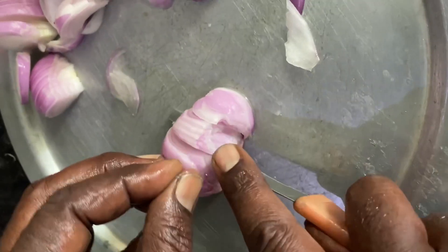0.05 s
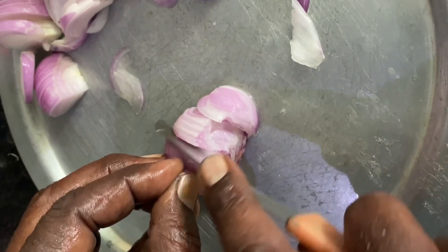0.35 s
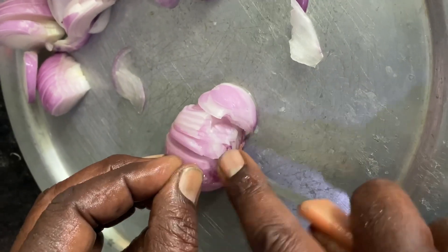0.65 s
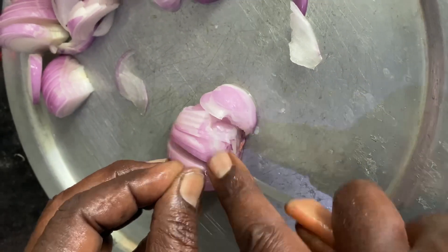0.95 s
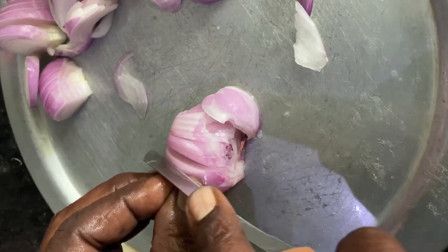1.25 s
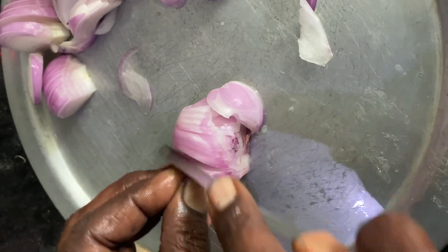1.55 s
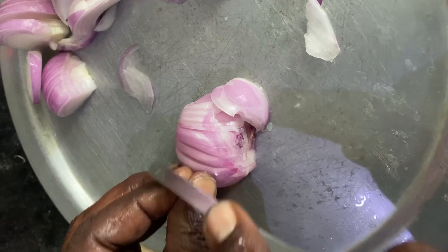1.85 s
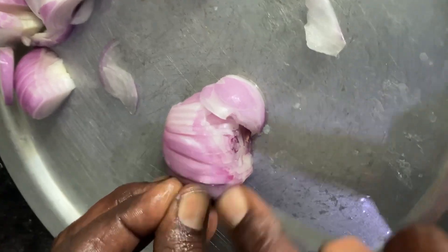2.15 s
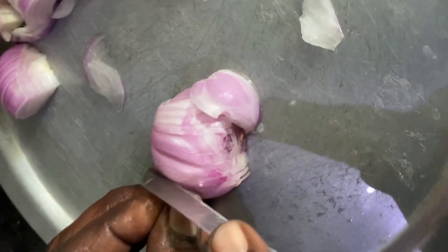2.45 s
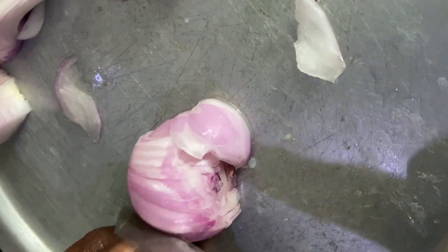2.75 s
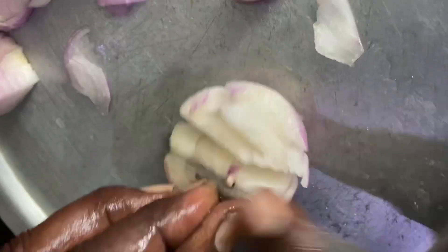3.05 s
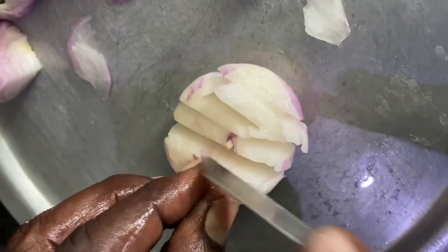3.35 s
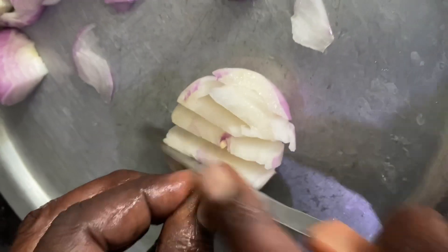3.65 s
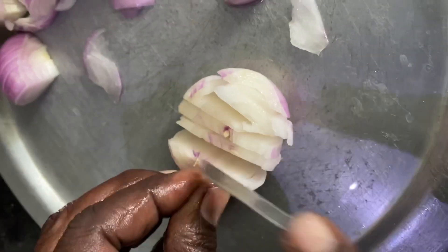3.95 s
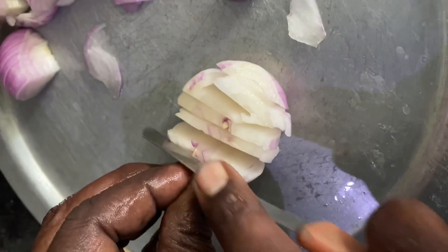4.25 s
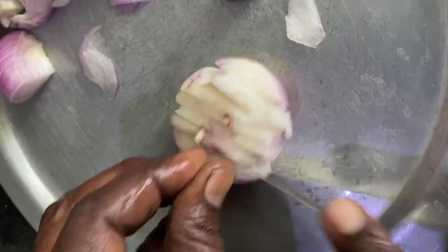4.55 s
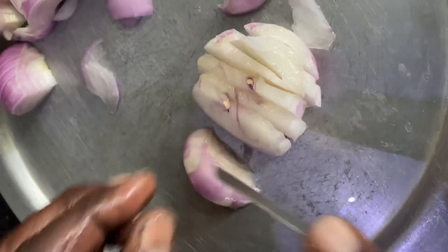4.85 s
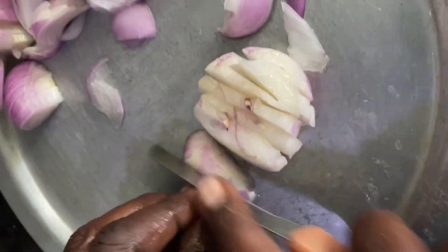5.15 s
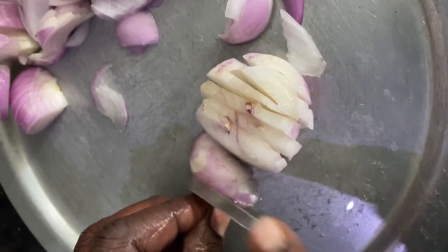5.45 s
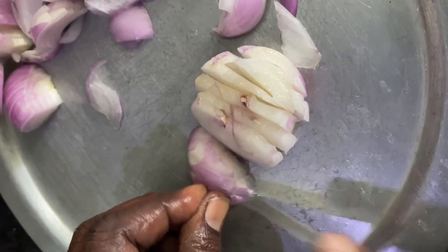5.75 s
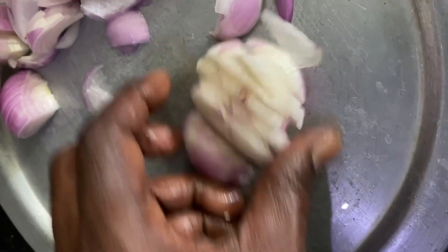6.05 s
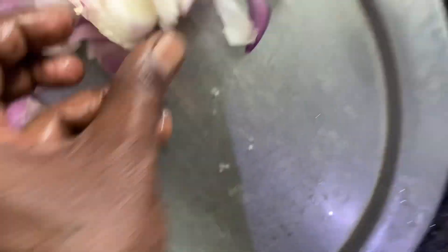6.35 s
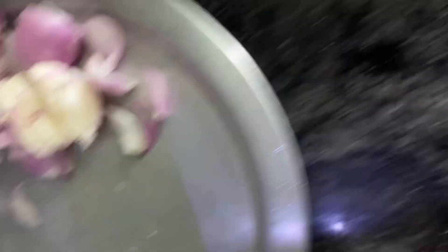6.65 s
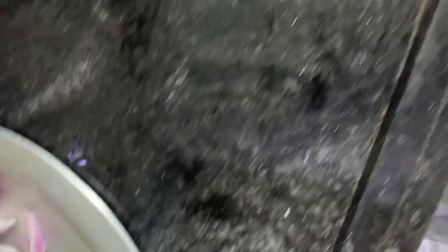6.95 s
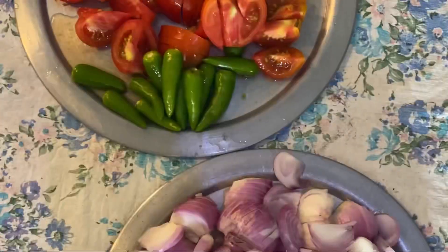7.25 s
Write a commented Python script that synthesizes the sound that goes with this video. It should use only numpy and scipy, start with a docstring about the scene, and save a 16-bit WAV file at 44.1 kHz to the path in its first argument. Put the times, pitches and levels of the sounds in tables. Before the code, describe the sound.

Close up, over a low hum and soft air noise, a knife crunches through onion and clicks against a steel plate at an uneven pace, echoing a little in the kitchen. After about three seconds the cuts turn lighter and the edge scrapes the metal as it is drawn back. Fingers shift the damp pieces, then a plate is knocked and rings briefly before a louder, deep airy noise takes over.

```python
"""A hard-walled kitchen, where a small knife slices an onion on a steel plate, close to a phone.
Each cut crunches through the layers and ends as the blade clacks on the steel. Once the bulb has
fallen open, the edge scrapes the plate as it is drawn back. Fingers shift the wet pieces, a motor hums,
and a limiter turns the echo down after loud clacks. Near the end a plate is bumped; its ring stops
short, and a louder rush of air follows."""
import sys
import numpy as np
from scipy import signal
from scipy.fft import rfft, irfft, next_fast_len
from scipy.io import wavfile
from scipy.ndimage import uniform_filter1d, minimum_filter1d

SR = 44100
rng = np.random.default_rng(int(sys.argv[2]) if len(sys.argv) > 2 else 0)


def persist_wave(psi):
    """Save psi, clipped to +-1, as 16-bit WAV."""
    counts = np.round(np.clip(psi, -1, 1) * 32767).astype(np.int16)
    wavfile.write(sys.argv[1], SR, np.atleast_2d(counts).T)


N = 322459
TIME = np.arange(N) / SR
SIDES = np.array([[1], [-1]])  # plus for the left ear, minus for the right

# Sounds on the plate have three parts: body (low), ring (middle) and hiss (high).
# In the tables, body and hiss turn those parts up or down against the ring.
# Knife cuts: blade meets steel/s, slicing time/s, crunch level/dB, crunch body/dB, juice hiss/dB,
# clack level/dB, chatter time/s, chatter f/Hz, clack body/dB, edge tick/dB, echo/dB
CUTS = [(0.5946, 0.061, -19.5, -1, -3.5, -4.5, 0.0077, 2410, -11, -7.5, 3.5),
        (0.94, .062, -23.5, 2, -0.5, -7, 0.0053, 2390, -9.5, -7.5, 5),
        (1.361, 0.07, -26, 1.5, 2.5, -11, 0.0047, 2470, -9.5, -9, 8.5),
        (2.1711, 0.086, -34, 7, 3, -10, 0.0037, 2675, -8.5, -5, 4.5),
        (2.7871, .04, -20, 1, -2.5, -6, 0.0051, 2770, -11, -6.5, 1.5),
        (3.086, .11, -35, -10.5, 1.5, -23.5, 0.0043, 2500, -8.5, -3, -6),
        (3.6996, .11, -39, -6, 3.5, -15.5, 0.005, 2496, -11.5, -6.5, -3.5),
        (4.4407, .08, -34, -6, 2.5, -18, 0.0031, 2500, -6.5, -2, 0),
        (5.119, 0.021, -44, -10, -11, -15.5, 0.0064, 2300, -5.5, -7, -4.5)]
# The blade is drawn out of the opened bulb: start/s, end/s, level/dB, body/dB, squeak level/dB
DRAWS = [(3.091, 3.224, -47, -6.5, -41.5), (3.698, 3.83, -37.5, -12.5, -30.5),
         (4.449, 4.596, -38, -15, -28.5), (5.127, 5.266, -31.5, -8.5, -51),
         (5.604, 5.787, -31.5, -8.5, -21)]
# Stretches of steady air noise: start/s, level/dB
STRETCHES = [(0, -51), (2.941, -56.5), (7.138, -58), (7.275, -39.5)]
BULB_OPENS_S, HUSH_S = STRETCHES[1][0], STRETCHES[2][0]


def amp(db):
    """Turn decibels into a factor to multiply by."""
    return 10 ** (np.asarray(db) / 20)


def unit(x):
    """Scale to an average power of 1."""
    return x / np.sqrt(np.mean(x ** 2) + 1e-20)


def add(out, s, x):
    """Mix x into out from time s."""
    i = max(int(s * SR), 0)
    part = out[..., i:i + x.shape[-1]]
    part += x[..., :part.shape[-1]]


def along(hz, points, values):
    """Join values by straight lines, giving each octave equal room."""
    return np.interp(np.log(np.maximum(hz, 1)), np.log(points), values)


def band(x, lo_hz, hi_hz, order=3):
    """Keep what lies between two frequencies."""
    sos = signal.butter(order, [lo_hz, min(hi_hz, .48 * SR)], "band", fs=SR, output="sos")
    return signal.sosfilt(sos, x)


def fade(t, t60):
    """Die away by 60 dB in t60 seconds, the fade time."""
    return np.exp(-np.log(1000) * t / t60)


def rise(t, rise_s):
    """Climb from 0 towards 1, most of the way in rise_s."""
    return 1 - np.exp(-t / rise_s)


def wander(t, rate):
    """Glide between random values, rate of them a second."""
    return np.interp(t * rate, np.arange(512), rng.standard_normal(512))


def at(states, s):
    """Pick what holds at time s: the whole bulb first, the opened bulb later."""
    return states[int(s > BULB_OPENS_S)]


def pair(mid, side, side_db=-2):
    """Sound from all around differs between left and right, mostly at middle pitches."""
    return mid + amp(side_db) * band(side, 270, 3700, order=2) * SIDES


def house_air():
    """The air of the house makes a soft, deep noise."""
    # Tone of the air: f/Hz, level/dB
    spectrum = [(20, -20.5), (40, -12.5), (75, -7), (150, -15.5), (230, -13), (400, -14.5), (800, -24),
                (1600, -30), (4400, -41), (7000, -47), (12000, -46.5), (16000, -64.5)]
    size = next_fast_len(N, True)
    gain = amp(along(np.fft.rfftfreq(size, 1 / SR), *np.transpose(spectrum)))
    mid, side = irfft(rfft(rng.standard_normal((2, size))) * gain, size)[:, :N]
    return unit(pair(mid + 0.38 * SIDES * side, side))


def motor_hum(waver_rad=0.55):
    """A motor hums with two slightly wavering tones."""
    # Hum tones: f/Hz, level/dB
    tones = [(150.3, -53), (333.8, -66.5)]
    drift = np.interp(TIME * 5, np.arange(64), rng.standard_normal(64))
    return sum(np.sqrt(2) * amp(db) * np.sin(2 * np.pi * hz * TIME + waver_rad * drift)
               for hz, db in tones)


def hands_and_counter(hand_boost_db=3, thud_db=-31.5, thud_width_s=0.052):
    """Hands rumble on the phone; each cut thuds through the counter, louder with a fuller crunch."""
    # Rumble of the hands: t/s, level before the boost/dB
    handling = [(0.0, -41.5), (0.63, -55.5), (1.07, -48), (1.65, -66), (2.63, -58), (3.55, -63),
                (5.92, -58.5), (6.03, -57.5), (6.9, -54)]
    mid, side = band(rng.standard_normal((2, N)), 65, 150, order=2)
    rumble = unit(mid + 0.18 * side * SIDES)
    thuds = sum(amp(thud_db + 0.43 * (db + body_db)) / (1 + ((TIME - s) / thud_width_s) ** 2) ** 2
                for s, _, db, body_db, *_ in CUTS)
    hands = amp(np.interp(TIME, *np.transpose(handling)) + hand_boost_db)
    return rumble * (thuds + hands)


def kitchen_echo(early_db=5, early_t60=0.28, room_db=0.5):
    """The room's answer to a click: quick returns from the counter, then a long tail that dulls."""
    # Echo tail: f/Hz, fade time/s, level/dB
    room = [(200, 0.39, -13.5), (500, 0.73, -12.5), (1134, 0.87, -4), (2580, 0.75, -6.5), (4970, 0.67, -2),
            (7200, .6, -11.5), (10700, 0.52, -6.5), (15000, .42, -8)]
    points, t60s, dbs = np.transpose(room)
    out, t, edges = 0, np.arange(SR) / SR, np.geomspace(100, 18000, 16)
    for lo, hi in zip(edges, edges[1:]):
        hz = np.sqrt(lo * hi)
        tail = fade(t, along(hz, points, t60s))
        shape = (tail + amp(early_db) * fade(t, early_t60)) * rise(t, 0.00044)
        noise = band(rng.standard_normal((2, SR)), lo, hi)
        out += amp(along(hz, points, dbs)) * noise * shape / np.sqrt(np.sum(shape ** 2))
    return amp(room_db) * pair(*out)


def plate_sliding(waver_db=3):
    """The rim of a sliding plate rubs the counter with a faint, unsteady ring."""
    # Ring of the rim: start/s, end/s, f/Hz, width/Hz, level/dB
    slide = (5.5, 7.5, 4449.5, 348.5, -81.5)
    start, end, hz, width, db = slide
    swell = np.sin(np.pi * np.clip((TIME - start) / (end - start), 0, 1))
    level = swell * amp(db + waver_db * wander(TIME, 25))
    return level * unit(band(rng.standard_normal(N), hz - width / 2, hz + width / 2, order=1))


def plate_bumping(crack_db=-9, rattle_db=-22, clink_db=-3):
    """A knock with a short crack leaves a plate rocking: it booms unevenly and faintly rattles."""
    # Knocks: t/s, level/dB
    bumps = [(6.952, -18.5), (7.048, -26.5)]
    # Tones of a freely ringing plate: f/Hz, fade time/s, level/dB, build-up/s
    tones = [(97.2, 3.3, -9.5, 0.134), (189, 0.21, -10.5, .004), (242, 0.24, -1, 0.0043),
             (275, 0.44, -14.5, 0.017), (558, 1.2, -23.5, 0.01856), (1060, 0.47, -19.5, 0.0019),
             (1564, 0.3, -21.5, 0.0011), (2190, 0.38, -26, 0.0027), (2580, 0.3, -28.5, 0.0019),
             (4570, 0.1, -17, .002), (5580, 0.16, -23, .002), (7950, 0.17, -41.5, .002)]
    out, t = np.zeros(N), np.arange(SR // 2) / SR
    for k, (s, db) in enumerate(bumps):
        ring = 0
        for hz, t60, tone_db, rise_s in tones:
            level = amp(tone_db + 2 * wander(t, 84)) * fade(t, t60) * rise(t, rise_s)
            ring += level * np.sin(2 * np.pi * hz * t + wander(t, 6 * np.sqrt(hz)))
        knock, clink = rng.standard_normal((2, len(t)))
        noise = unit(band(knock, 380, 1880, order=2))
        noise += amp(clink_db) * unit(band(clink, 4160, 8900, order=2))
        crack = amp(crack_db - 8.3 * k) * fade(t, 0.042)
        rattle = amp(rattle_db) * fade(t, 0.49)
        add(out, s, amp(db) * (ring + (crack + rattle) * noise * rise(t, 0.0005)))
    return out


def damped_plate(opened, direct_db=-11):
    """Muffled by onion and hand, the plate answers a tap briefly. Returns its body, ring and hiss."""
    # Plate tones: f/Hz, fade time/s, level with the bulb whole/dB, level with it open/dB
    tones = [(230, 0.034, -10.5, -10.5), (409.5, 0.11, -2, -24), (540, 0.012, 0.5, -18),
             (907, 0.025, 1, -20), (998, 0.014, 6.5, 9), (1250, 0.018, -7.5, 1), (1584, 0.0087, 6, 9.5),
             (2180, 0.004, 9.5, 8.5), (2280, 0.01, 2.5, -3), (2570, 0.013, 1, 0.5), (3530, 0.04, -4.5, 1.5),
             (3940, 0.004, -4, -6.5), (4500, 0.012, -5, -6), (6730, 0.0089, -8.5, -11),
             (10300, 0.001, -10, -14.5)]
    tap, t = 0, np.arange(1500) / SR
    for hz, t60, *dbs in tones:
        gain = amp(dbs[opened]) * 2 * np.log(1000) / (t60 * SR)  # longer tones start weaker
        tap += gain * fade(t, t60) * np.cos(2 * np.pi * hz * t)
    tap[0] += amp(direct_db)
    # lighter strokes on the opened bulb press less bass into the plate
    body = band(tap, 300 if opened else 130, 1400, order=2)
    ring = band(tap, 1550, 3700, order=2)
    hiss = band(band(tap, 5800, 20000), 100, 19000, order=1)
    return body, ring, hiss


def spread(force, width_db=-9):
    """The broad plate sends body and ring unevenly to the two sides; the hiss comes from one point."""
    wide = force[0] + amp(width_db) * SIDES * force[1]
    return wide, wide, force[[0, 0]]


def contact(plate, forces, span_s, body_db, hiss_db, body_left_db=7):
    """Forces shake the plate's three parts; each gets the energy of span_s seconds at its level."""
    parts = [signal.fftconvolve(force, [answer], axes=1) for force, answer in zip(forces, plate)]
    gains = amp(body_db + 5 + SIDES * body_left_db / 2), 1, amp(hiss_db + 4.5)
    return sum(gain * part * np.sqrt(2 * span_s * SR / np.sum(part ** 2))
               for gain, part in zip(gains, parts))


def stroke(length_s, db, shape_db, grain_db, jerk_db, jerk_hz=350):
    """Jerky rubbing shaped by shape_db(progress 0-1). Returns forces and their span for contact()."""
    t = np.arange(max(int(length_s * SR), 64)) / SR
    swell = amp(db + shape_db(t / t[-1])) * rise(t, 0.19 * t[-1])
    jerks = amp(jerk_db * wander(t, jerk_hz))
    size = (2, SR // 4)
    # countless tiny breaks, a few much larger than the rest
    grains = rng.standard_normal(size) * amp(grain_db * np.minimum(rng.exponential(size=size), 5))
    return spread(swell * jerks * grains[:, :len(t)]), np.sum(swell ** 2) / SR


def wet_ticking(steel, ticks_per_spell=6):
    """Wet pieces of onion tick faintly under the fingers."""
    # Spells of finger work: start/s, end/s, typical level/dB
    spells = [(0.251, 0.502, -55.5), (1.71, 1.837, -59), (2.443, 2.679, -53.5), (3.4, 3.652, -63),
              (4.594, 4.998, -82), (6.178, 6.321, -48.5)]
    out, t = np.zeros((2, N)), np.arange(500) / SR
    for start, end, db in spells:
        for when, softness, brightness in rng.random((ticks_per_spell, 3)):
            force = rng.standard_normal((2, len(t))) * fade(t, .012) * rise(t, .001)
            tick = contact(steel[0], spread(force), 0.0015, body_db=-5, hiss_db=12 * brightness - 9)
            add(out, start + when * (end - start), amp(db - 3 * np.log(0.061 + softness)) * tick)
    return out


def pieces_rustling(steel, wane_db=8.5):
    """Fingers slide pieces of onion over each other and over the plate."""
    # Rustles: start/s, end/s, level/dB, hiss/dB
    rustles = [(2.942, 2.99, -59.5, -5), (3.43, 3.63, -55.5, -10.5), (4.2, 4.342, -52.5, -7),
               (5.548, 5.595, -43.5, -15), (6.0, 6.19, -53, -5), (6.193, 6.249, -43.5, 2.5)]
    out = np.zeros((2, N))
    for start, end, db, hiss_db in rustles:
        forces, span = stroke(end - start, db, lambda u: -wane_db * u, grain_db=3.5, jerk_db=2)
        add(out, start, contact(at(steel, start), forces, span, body_db=-5, hiss_db=hiss_db))
    return out


def blade_drawing(steel, wane_db=12):
    """The flat of the blade rubs wet onion, fading as it comes free."""
    out = np.zeros((2, N))
    for start, end, db, body_db, _ in DRAWS:
        forces, span = stroke(end - start, db, lambda u: -wane_db * u, grain_db=1.5, jerk_db=0)
        add(out, start, contact(at(steel, start), forces, span, body_db, hiss_db=-7.5))
    return out


def edge_scraping(steel, squeak_hz=2350, squeak_s=0.048, swell_db=17):
    """As each draw ends, the edge sticks and slips on the steel and makes the plate squeak."""
    out = np.zeros((2, N))
    for _, end, _, _, db in DRAWS:
        forces, span = stroke(squeak_s, db, lambda u: -swell_db * (1 - u), grain_db=6.5, jerk_db=3)
        body, ring, hiss = forces
        squeak = band(ring, 0.76 * squeak_hz, 1.4 * squeak_hz, order=1)
        scrape = contact(at(steel, end), (body, squeak, hiss), span, body_db=-45, hiss_db=-19)
        add(out, end - squeak_s, scrape)
    return out


def layers_snapping(steel, snap_t60=0.031):
    """Single layers of onion give way and the knife taps lightly."""
    # Snaps and taps: t/s, level/dB, body/dB, hiss/dB
    snaps = [(0.262, -34, -11.5, -10), (0.428, -43.5, 3, -4), (0.534, -32, -4, -6.5),
             (0.554, -25, -5.5, -8), (.566, -22.5, -1.5, -11.5), (0.578, -18, -5, -15),
             (1.808, -54.5, 6.5, -4.5), (2.114, -33.5, 0.5, -4.5), (2.140, -28, 2, -1), (2.763, -35, 5, -3),
             (2.991, -48, -3, -3), (3.184, -45, -5, -0.5), (3.631, -43, -4, -1.5), (3.682, -42, -23, 5),
             (4.588, -34.5, -13.5, -10.5), (4.665, -42.5, 1, -12), (5.0222, -45.5, 7, -26),
             (5.2065, -25.5, -14.5, -14), (5.581, -35.5, -7.5, -25), (5.633, -32, -5.5, -34),
             (6.065, -50.5, -28, -3), (6.277, -54, 5.5, -0.5), (6.386, -69, 12.5, 9.5)]
    out, t = np.zeros((2, N)), np.arange(900) / SR
    for s, db, body_db, hiss_db in snaps:
        force = rng.standard_normal((2, len(t))) * fade(t, snap_t60) * rise(t, 0.0013)
        add(out, s, amp(db) * contact(at(steel, s), spread(force), 0.0089, body_db, hiss_db))
    return out


def onion_slicing(steel, layer_s=0.0087, sag_db=2.5, swell_db=24):
    """Cell walls burst along the blade, layer by layer and ever louder until it meets the steel."""
    out = np.zeros((2, N))
    for s, length, db, body_db, hiss_db, *_ in CUTS:
        def shape_db(u):
            """The crunch sags between layers, and its swell levels off near the steel."""
            layers = (u - 1) * length / layer_s + 0.12 * wander(u * length, 1 / layer_s)
            return sag_db * (.5 - layers % 1) - swell_db * (1 - u) ** 1.3
        forces, span = stroke(length, db, shape_db, grain_db=2, jerk_db=6)
        add(out, s - length, contact(at(steel, s), forces, span, body_db, hiss_db))
    return out


def blade_clacking(steel, tick_t60=0.02, bounce_db=-2):
    """The blade hits the steel, chatters and rings. Returns that sound and single blows for the echo."""
    # Blade tones: f/Hz, fade time/s, level with the bulb whole/dB, level with it open/dB
    tones = [(3558, 0.021, 2.5, 1), (4000, 0.02, -7.5, 5.5), (4526, 0.02, -4.5, 2.5)]
    near, to_room, t = np.zeros((2, N)), np.zeros((2, N)), np.arange(1000) / SR
    blow, push = np.array([t == 0] * 2, float), rise(t, .0012)
    for s, *_, db, chatter_s, chatter_hz, body_db, tick_db, echo_db in CUTS:
        plate = at(steel, s)
        body, ring, hiss = spread(np.sign(rng.standard_normal((2, len(t)))))
        press = push / (1 + (t / chatter_s) ** 12)  # drops away as the edge settles
        bounces = amp(bounce_db) * np.sin(2 * np.pi * chatter_hz * t + 2.1 * wander(t, 800))
        tick = hiss * fade(t, tick_t60) * rise(t, 0.00065)
        forces = body * press, (ring + bounces) * press, tick
        blade = sum(amp(at(dbs, s)) * fade(t, t60) * np.sin(2 * np.pi * hz * t + wander(t, 330))
                    for hz, t60, *dbs in tones)
        add(near, s, amp(db) * contact(plate, forces, 0.0047, body_db, tick_db))
        add(near, s, amp(db) * push * blade)
        add(to_room, s, amp(db + echo_db) * contact(plate, [blow] * 3, 0.0038, body_db, tick_db))
    return near, to_room


def scene(snap_echo_db=-5.5, scrape_echo_db=-11.5, lingering_db=20):
    """Mix knife, onion and room. At each new stretch the air level jumps and the echo stops dead."""
    steel = [damped_plate(opened) for opened in (False, True)]
    echo, air = kitchen_echo(), house_air()
    clacks, blows = blade_clacking(steel)
    scrapes = edge_scraping(steel)
    rubs = onion_slicing(steel) + blade_drawing(steel) + pieces_rustling(steel)
    snaps = layers_snapping(steel) + wet_ticking(steel)
    out = rubs + snaps + scrapes + clacks + plate_sliding()
    out += (plate_bumping() + motor_hum() + hands_and_counter()) * (TIME < HUSH_S)
    to_room = np.mean(rubs + amp(snap_echo_db) * snaps + amp(scrape_echo_db) * scrapes + blows, axis=0)
    edges = [int(s * SR) for s, _ in STRETCHES] + [N]
    for (_, air_db), i, j in zip(STRETCHES, edges, edges[1:]):
        out[:, i:j] += amp(air_db) * air[:, i:j]
        out[:, i:j] += signal.fftconvolve(echo, [to_room[i:j]], axes=1)[:, :j - i]
    # at the start, the room still rings from an earlier cut
    body, ring, hiss = steel[0]
    lingering = signal.fftconvolve(echo, [0.37 * body + ring + 1.5 * hiss], axes=1)
    add(out, 0, amp(lingering_db) * lingering[:, SR // 5:])
    return out


def microphones(x):
    """Two microphone openings, set apart, hear each pitch with different strength and timing."""
    # Left against right: f/Hz, extra level/dB, phase lead/rad
    ports = [(100, 1, 0), (390, -0.5, 1.51), (624.4, 0.5, 1.4), (800, 2.5, 1.53), (1130, 3.5, 2.5),
             (1330, -5, 2.5), (2030, 2.5, 0.46), (2500, 3.5, 0.76), (4250, 7, 0), (5760, 5.5, 2),
             (7200, 0.5, 0.45), (9330, 0.5, -4.5), (10700, 0, -5), (12700, -1, -8.5), (14500, 0.5, -11),
             (17110, -1.5, -10)]
    points, balance_db, lead = np.transpose(ports)
    size = next_fast_len(N, True)
    hz = np.fft.rfftfreq(size, 1 / SR)
    gain = amp(SIDES * along(hz, points, balance_db) / 2)
    phase = SIDES * along(hz, points, lead) / 2
    return irfft(rfft(x, size) * gain * np.exp(1j * phase), size)[:, :N]


def limiter(x, ceiling_db=-9, hold_s=0.068, release_db_per_s=70, attack_s=0.012):
    """The volume drops quickly at a loud peak, holds, then climbs back; the bass drops less."""
    power = uniform_filter1d(np.max(x ** 2, axis=0), 88)  # averaged over 2 ms
    level_db = 10 * np.log10(np.maximum(power, 0) + 1e-12)
    half_hold, half_attack = int(hold_s * SR / 2), int(attack_s * SR / 2)
    gain_db = np.minimum(ceiling_db - level_db, 0)
    gain_db = minimum_filter1d(gain_db, 2 * half_hold + 1, origin=half_hold)
    gain_db = np.minimum.accumulate(gain_db - release_db_per_s * TIME) + release_db_per_s * TIME
    gain_db = uniform_filter1d(gain_db, 2 * half_attack + 1, origin=half_attack)
    bass = signal.sosfiltfilt(signal.butter(2, 260, fs=SR, output="sos"), x)
    return (x - bass) * amp(gain_db) + bass * amp(0.65 * gain_db)


def record(dry, top_hz=15800):
    """The phone hears the sound, limits it, flattens peaks that slip past and cuts the top treble."""
    limited = np.clip(limiter(microphones(dry)), -1, 1)
    return signal.sosfilt(signal.ellip(8, .2, 70, top_hz, fs=SR, output="sos"), limited)


dry = scene()
out = record(dry)
persist_wave(out)
```